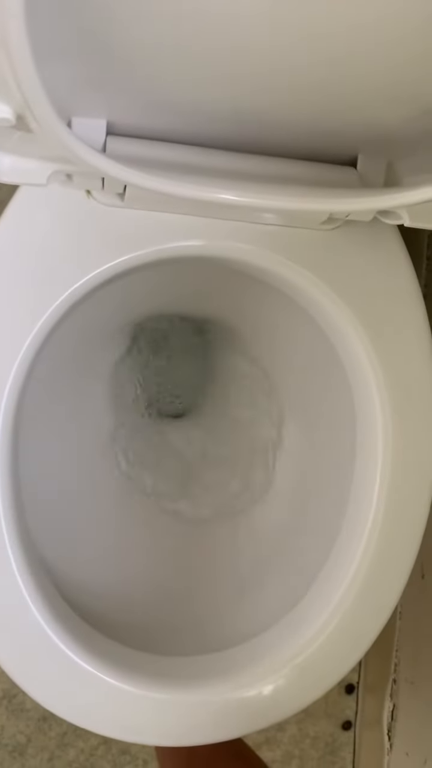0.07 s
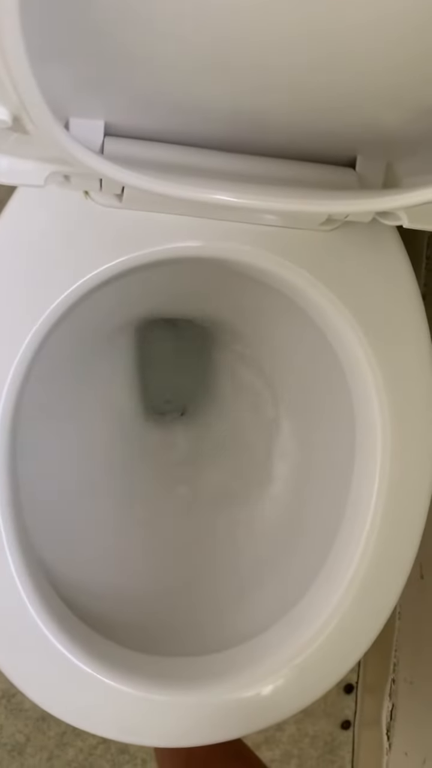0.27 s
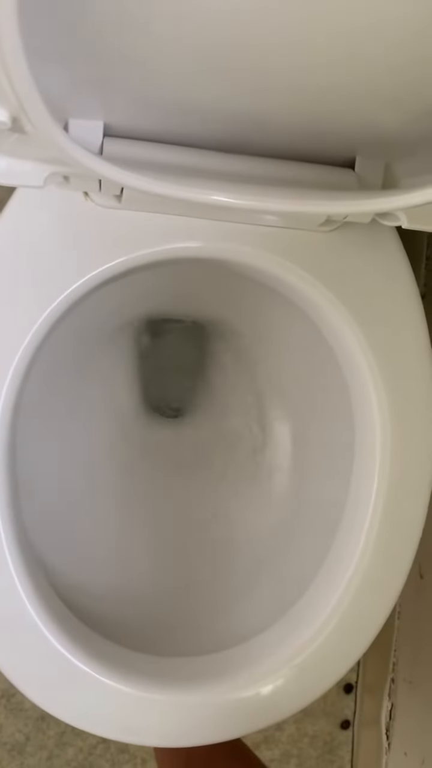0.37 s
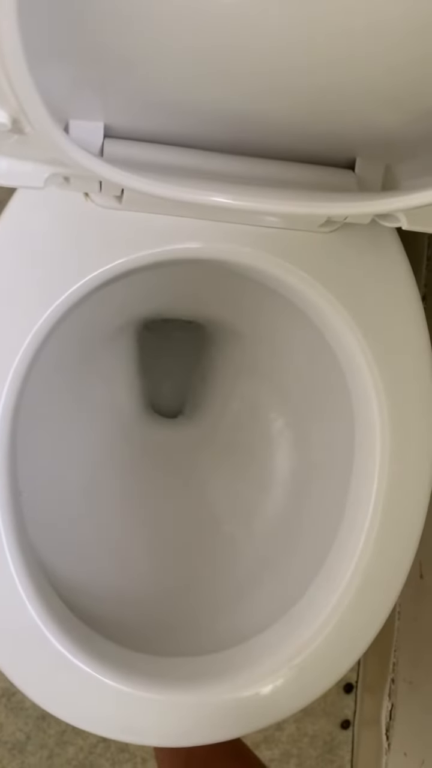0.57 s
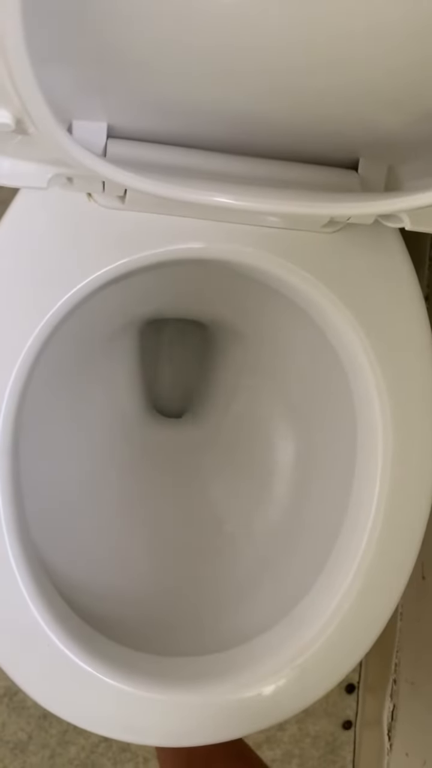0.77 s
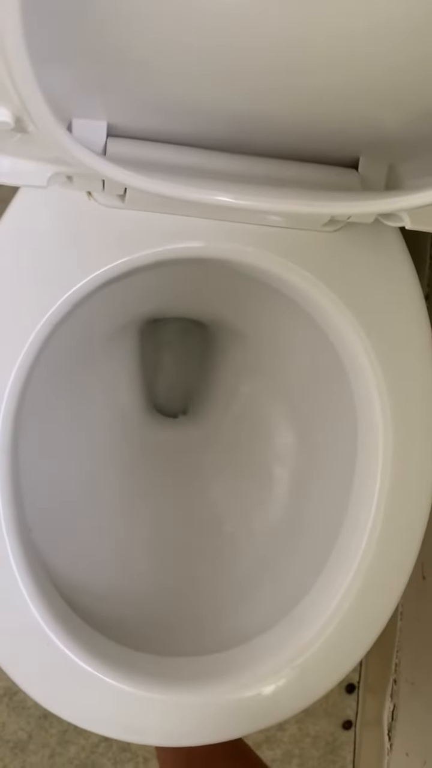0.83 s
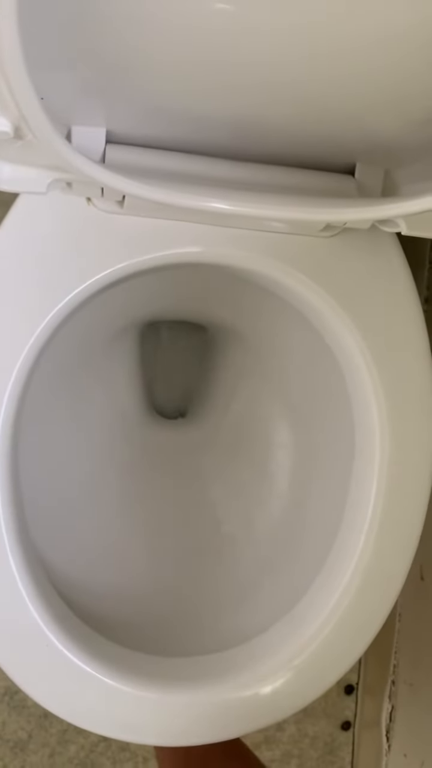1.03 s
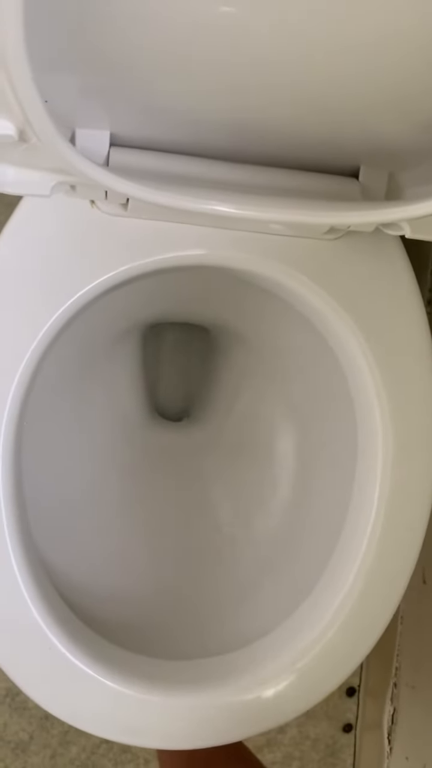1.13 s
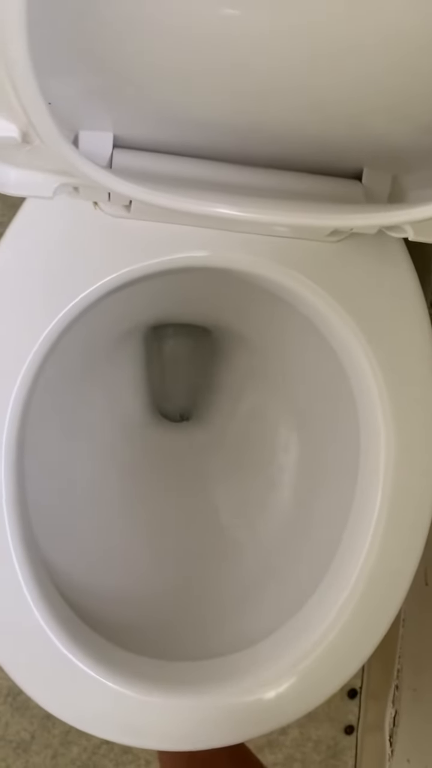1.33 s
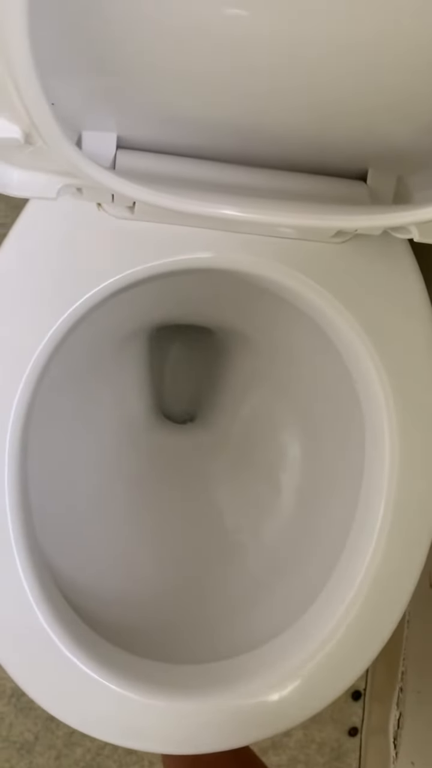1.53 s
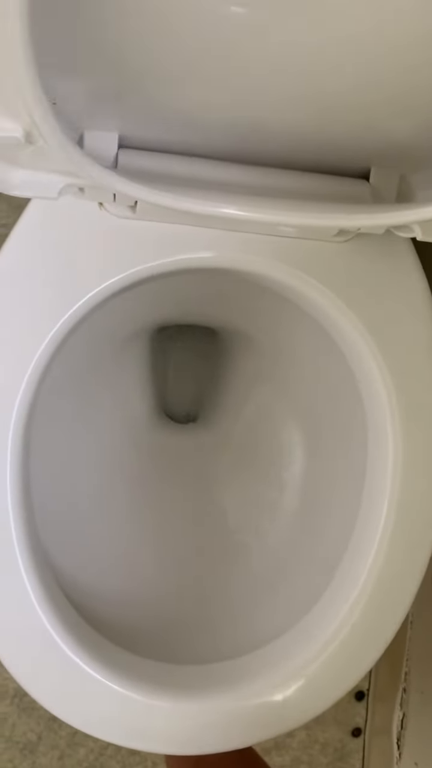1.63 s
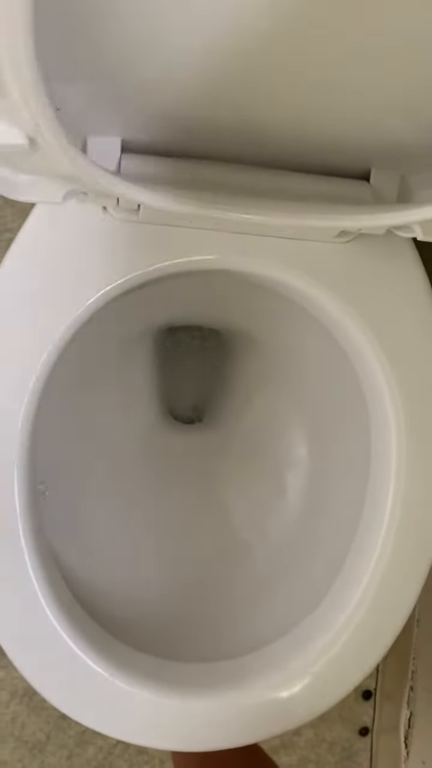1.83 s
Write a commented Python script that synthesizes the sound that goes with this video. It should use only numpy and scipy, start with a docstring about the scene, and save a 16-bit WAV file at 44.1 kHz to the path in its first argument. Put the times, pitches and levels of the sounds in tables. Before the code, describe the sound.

Wet, hollow gurgles from a toilet bowl as the last flush water drains away, then it settles

```python
"""Air gulping down a drain at the end of a toilet flush, heard from above the bowl in a small tiled room.
Each gulp booms as a pocket in the trap, rings a cluster of bubbles, sloshes the bowl and throws noisy spray.
Around it lone bubbles ring, the low ones as a thump, and drops tick; rinse water is bubble swarms and hiss.
Behind lies the drain pipe: a narrow noise drone over rumble.
Phase and level differences spread the water in stereo."""
import sys
import numpy as np
from scipy import signal
from scipy.fft import rfft, irfft
from scipy.io import wavfile

SR = 44100
rng = np.random.default_rng(int(sys.argv[2]) if len(sys.argv) > 2 else 0)


def inscribe(sig):
    """Save sig as 16-bit PCM at rate SR to the path in sys.argv[1].

    A 1-D sig is mono; a 2-D sig holds one channel per row.
    Samples are clipped to [-1, 1] before scaling.
    """
    pcm = np.round(np.clip(np.atleast_2d(sig).T, -1, 1) * 32767)
    wavfile.write(sys.argv[1], SR, pcm.astype(np.int16))


N = 83790  # samples, 1.9 s
T = np.arange(N) / SR
HZ = np.maximum(np.arange(N + 1) * SR / (2 * N), 1)  # frequency axis of the filters

# Drone of the drain pipe: [t/s, level/dB]
DRONE_LEVEL = [(0, -42.5), (.3, -31.5), (.5, -39.5), (.9, -37.5), (.98, -29.5), (1.15, -35), (1.45, -31),
               (1.65, -38), (1.9, -39)]
# Soft rumble under the drone, spectrum: [f/Hz, relative level/dB]
RUMBLE_SPECTRUM = [(25, -40), (50, 11), (110, -18), (180, 8.5), (300, -15), (600, -12), (2000, -51)]
# Running water: [t/s, low gurgle level/dB, churning in the bowl level/dB, relative hiss and fizz level/dB]
FLOW_LEVELS = [(0, -35, -72, -39), (.11, -36.5, -55, -37), (.16, -42, -48, -31), (.35, -32, -43.5, -36),
               (.52, -30, -28, -30), (.6, -23.5, -29, -28), (.69, -26, -32, -31.5), (.8, -33, -30, -31),
               (.9, -29.5, -34.5, -32.5), (1.05, -34, -27, -33.5), (1.24, -29.5, -29.5, -31),
               (1.33, -18.5, -30, -34), (1.5, -28, -29.5, -33.5), (1.6, -29, -27.5, -33),
               (1.72, -43.5, -41, -33.5), (1.9, -40, -35, -37)]
# Hiss of the rinse water, spectrum: [f/Hz, relative level/dB]
HISS_SPECTRUM = [(800, 14.5), (1600, 12), (2300, 2.5), (3500, 5), (5200, 0), (8500, 3.5), (11500, 1.5),
                 (15500, -2)]
# Lone bubbles that ring on: [t/s, starting f/Hz, level/dB, decay/s]
LONE_BUBBLES = [(.118, 554.4, -22, 0.084), (0.119, 120, -13, 0.017), (.139, 2065, -11, 0.005),
                (.141, 1879, -26, 0.056), (.141, 1604, -11, 0.0046), (0.146, 1130, -39, 0.028),
                (0.153, 81.3, -12, 0.053), (0.287, 1880, -22, .026), (0.313, 1482, -18, 0.011),
                (0.379, 403, -20, 0.03), (0.448, 1874, -22, 0.0074), (.482, 2940, -19, 0.0058),
                (0.482, 1009, -7.5, 0.011), (.643, 1856, -19, .007), (0.705, 2770, -20.5, 0.012),
                (0.842, 1105, -7, 0.005), (.845, 221.6, -23, 0.052), (1.03, 915, -11, 0.0086),
                (1.294, 1863, -14.5, 0.0077), (1.301, 1064, -8.5, 0.0059), (1.386, 1410, -20.5, 0.02),
                (1.5434, 1057, -4, 0.0037), (1.685, 929, -27.5, 0.02), (1.71, 269, -23.5, 0.017),
                (1.813, 1770, -16, 0.003), (1.83, 224, -26.5, 0.028)]
# Single splashing drops: [t/s, relative level/dB, splash f/Hz]
SPLASH_DROPS = [(.139, -13, 2120), (0.139, -18.5, 9000), (0.166, -26, 6050), (0.313, -21.5, 10600),
                (.374, -23.5, 10200), (0.481, -23, 6500), (0.562, -15.5, 2870), (0.93, -19, 6100),
                (1.199, -23, 6300), (1.385, -23, 7300), (1.412, -22, 11100), (1.589, -24, 7050),
                (1.723, -22.5, 4000)]
# Gulps of air: [t/s, starting bubble f/Hz, starting air pocket f/Hz,
#                relative pocket level/dB, relative bubbles level/dB, relative spray level/dB]
AIR_GULPS = [(.115, 952, 229, -26, -24, -51), (0.252, 1456, 233, -24.5, -22.5, -36.5),
             (0.374, 1057, 350.5, -17.5, -23.5, -60), (.425, 848, 426, -26.5, -19, -36),
             (.473, 990, 318, -19.5, -17, -30.5), (.547, 998, 243, -22.5, -21, -33),
             (0.564, 1015, 338, -19, -34, -48), (.581, 1040, 318, -16.5, -26.5, -34.5),
             (0.601, 983, 409, -25, -15.5, -48), (.625, 944, 323, -19, -23.5, -32),
             (.688, 1434, 282, -16.5, -17.5, -30), (.701, 972, 299.5, -14, -15.5, -21),
             (.744, 712, 315, -19, -23, -30), (.839, 622, 248, -16, -13, -22),
             (.956, 833, 387.6, -19, -14, -24.5), (1.106, 1060, 232, -14.5, -46, -38),
             (1.119, 965, 381, -23, -19.5, -26), (1.271, 940, 311, -13, -25, -39),
             (1.291, 675, 267, -25, -14, -27.5), (1.3, 878, 273, -11, -17.5, -38),
             (1.317, 656, 385, -16, -17.5, -33), (1.34, 928, 321, -18, -21.5, -41),
             (1.358, 657, 380, -25, -20.5, -47), (1.385, 963, 310.5, -11, -16.5, -47),
             (1.414, 812, 314, -16, -16, -31.5), (1.539, 924, 287, -22, -16, -30)]
# Spray and the ticks of drops, spectrum: [f/Hz, relative level/dB]
SPRAY_SPECTRUM = [(600, -58), (1500, -1), (3000, 5), (5000, -1), (8000, -1.5), (11500, -2.5), (15500, -16)]
# Resonances of bowl and trap: [f/Hz, width/Hz, relative level/dB]
BOWL_RESONANCES = [(229, 12.6, 3.5), (305, 22, -3.5), (381, 21.4, 8.5), (637, 207, -7.5), (880, 254, -6.5),
                   (1078, 204, -4), (1368, 48, 0.5), (1789, 54, -1)]
# Pitches that cancel inside the bowl: [f/Hz, width/Hz, depth/dB]
BOWL_HOLLOWS = [(181.5, 35, -30), (555, 113, -4), (1208, 110, -57.5), (1596, 78, -16.5), (2070, 2000, -5.5)]
# Phase lead of the left channel by frequency: [f/Hz, phase/rad]
LEFT_LEAD = [(0, 0), (300, -.1), (860, -.7), (1900, .6), (3300, 1.2), (4750, 3.14), (6700, 6.28),
             (15400, 18.85), (22050, 28.5)]
# Level balance of left and right by frequency: [f/Hz, left minus right level/dB]
LEFT_RIGHT_BALANCE = [(330, -0.5), (600, -2), (1000, -7), (1500, -2.5), (2400, -2), (4000, -0.5)]

# Drain pipe; the drone passes its resonance twice
DRONE_HZ, DRONE_WIDTH_HZ, RUMBLE_DB = 76.1, 16.2, -44
# Rinse water: swarms of small bubbles, then the mix of fizz and hiss
GURGLE_PER_S, GURGLE_CYCLES, GURGLE_SPREAD_DB = 170, 4.5, 3.5
CHURN_PER_S, CHURN_CYCLES, CHURN_SPREAD_DB = 320, 9, 4
FIZZ_PER_S, FIZZ_CYCLES, FIZZ_SPREAD_DB = 1500, 14, 4.5
CHURN_GLIDE, FIZZ_GLIDE = 0.025, 0.002  # share of the pitch climbed in one decay time
FIZZ_DB, HISS_DB = -6, -1
HISS_PATCHY_DB, SPRAY_PATCHY_DB, PATCHES_PER_S = 3.5, 6.5, 170
# Bubbles and drops
BUBBLE_ONSET_CYCLES, BLOOP_RISE_PER_S = 0.55, 0.026
TICK_DB, TICK_ATTACK_S, TICK_DECAY_S = -8, 0.0002, 0.0018
DROP_DB, DROP_ATTACK_S, DROP_DECAY_S, DROP_WIDTH = -7.5, 0.0013, 0.01, 0.61  # width as a share of f
# Gulps: trims on the table levels, and the shape of each part
POCKET_DB, POCKET_DECAY_S, POCKET_RISE_PER_S = 5, 0.013, 1.6
BUBBLE_DB, BUBBLE_CYCLES, BUBBLE_RISE_PER_S = 5.5, 5.83, 3.46
SATELLITE_DB, SATELLITE_SPAN_S, SATELLITE_OCTAVES, SATELLITE_CYCLES = -7.5, 0.02, 0.238, 5.6
SLOSH_DB, SLOSH_ATTACK_S, SLOSH_DECAY_S = -4, 0.00399, 0.012
SPRAY_DB, SPRAY_LAG_S, SPRAY_ATTACK_S, SPRAY_DECAY_S = 1.5, 0.0035, 0.0015, 0.0085
# Room and recorder
ROOM_T60_S, ROOM_GAP_S, ROOM_DB, ROOM_TREBLE_DB = 0.19, 0.0065, -11.5, -4
TOP_HZ = 15800


def undb(db):
    """Decibels to gain."""
    return 10 ** (np.asarray(db) / 20)


def unit(x):
    """Scale to rms 1."""
    return x / np.sqrt(np.mean(x ** 2))


def filt(x, response):
    """Filter by a response given on HZ."""
    return irfft(rfft(x, 2 * N) * response)[..., :N]


def colour(points):
    """Gain on HZ from (f/Hz, level/dB) points, joined along log frequency."""
    hz, db = np.array(points, float).T
    return undb(np.interp(np.log(HZ), np.log(hz), db))


def resonance(hz, width):
    """Response of one band-pass resonance."""
    return 1 / (1 + 1j * (HZ ** 2 - hz ** 2) / (HZ * width))


def curve(table, axis=1):
    """Gain over time from a dB column."""
    columns = np.array(table, float).T
    return undb(np.interp(T, columns[0], columns[axis]))


def add(out, s, sound):
    """Mix a sound in at time s."""
    start = int(np.clip(s * SR, 0, N - 1))
    out[start:start + len(sound)] += sound[:N - start]


def burst(noise, attack, decay):
    """Noise that swells and dies away, with the energy of its envelope at peak 1."""
    t = T[:len(noise)]
    env = (1 - np.exp(-t / attack)) * np.exp(-t / decay)
    energy = np.sqrt(np.mean(env ** 2)) / env.max()
    return unit(noise * env) * energy


def bubble(hz, decay, rise):
    """A damped ring that swells within a cycle or two; its pitch climbs as the bubble nears the surface."""
    t = T[:int(6 * decay * SR) + 2]
    ring = np.sin(2 * np.pi * hz * t * (1 + rise * t / 2))
    onset = 1 - np.exp(-(t * hz / BUBBLE_ONSET_CYCLES) ** 2)
    return ring * np.exp(-t / decay) * onset


def swarm(per_s, low_hz, high_hz, cycles, spread_db, glide):
    """Random small bubbles, a few louder than the rest; each climbs by the share glide as it fades."""
    out = np.zeros(N)
    draws = rng.random((6000, 3))
    pitch_ratio = min(high_hz, TOP_HZ) / low_hz
    for when, pitch, size in draws[:int(per_s * N / SR)]:
        hz = low_hz * pitch_ratio ** pitch
        level = undb(-spread_db * np.log(size + 0.02)) * np.sqrt(hz)
        add(out, when * N / SR, level * bubble(hz, cycles / hz, glide * hz / cycles))
    return unit(out)


def patchy(spectrum, depth_db, count=20):
    """Noise of many droplets: every narrow band flares and fades on its own."""
    noise = rfft(rng.standard_normal(N), 2 * N) * colour(spectrum)
    out = 0
    step = TOP_HZ / (count - 1)
    for k in range(count):
        flare = np.interp(T * PATCHES_PER_S, np.arange(N // 50), rng.standard_normal(N // 50))
        band = np.maximum(1 - abs(HZ / step - k), 0)  # triangles that overlap their neighbours
        out = out + irfft(noise * band)[:N] * undb(depth_db * flare)
    return unit(out)


def bowl():
    """Response of the bowl and its trap: resonances in a broad band, closed off at both ends."""
    modes = sum(undb(db) * resonance(hz, width) for hz, width, db in BOWL_RESONANCES)
    return modes * resonance(440, 990) / (1 + (170 / HZ) ** 6) / (1 + (HZ / 2300) ** 6)


def hollows():
    """Response of the dips where reflections in the bowl cancel."""
    dips = [1 - (1 - undb(db)) * resonance(hz, width) for hz, width, db in BOWL_HOLLOWS]
    return np.prod(dips, axis=0)


def room(x):
    """Tiled walls: a short dense tail, alike on both sides in the bass."""
    env = undb(-60 * T / ROOM_T60_S) * (T > ROOM_GAP_S)
    tails = rng.standard_normal((2, N)) * env / np.sqrt(np.sum(env ** 2))
    mid, side = rfft(tails, 2 * N)
    apart = np.clip(HZ / 330, 0, 1) ** 2
    walls = (mid + apart * side * np.array([[1], [-1]])) / np.sqrt(1 + apart ** 2)
    tiles = colour([(90, -2), (250, 3.5), (2200, 9.0), (6000, ROOM_TREBLE_DB)])
    return filt(x, walls * tiles) * undb(ROOM_DB)


def drain():
    """The air in the drain pipe drones over a soft rumble."""
    drone = signal.hilbert(filt(rng.standard_normal(N), resonance(DRONE_HZ, DRONE_WIDTH_HZ) ** 2))
    drone = unit(drone.real / np.sqrt(abs(drone)))  # evens out the swells of narrow noise
    rumble = unit(filt(rng.standard_normal(N), colour(RUMBLE_SPECTRUM)))
    return drone * curve(DRONE_LEVEL) + undb(RUMBLE_DB) * rumble


def rinse():
    """Water gurgles in the trap, churns in the bottom of the bowl, and fizzes and hisses down its sides."""
    gurgle = swarm(GURGLE_PER_S, 191.2, 390.5, GURGLE_CYCLES, GURGLE_SPREAD_DB, CHURN_GLIDE)
    gurgle = unit(filt(gurgle, np.sqrt(bowl())))
    churn = swarm(CHURN_PER_S, 636.8, 2428, CHURN_CYCLES, CHURN_SPREAD_DB, CHURN_GLIDE)
    churn = unit(filt(churn, bowl()))
    fizz = swarm(FIZZ_PER_S, 1678, 11740, FIZZ_CYCLES, FIZZ_SPREAD_DB, FIZZ_GLIDE)
    fizz = unit(filt(fizz, colour(HISS_SPECTRUM)))
    hiss = patchy(HISS_SPECTRUM, HISS_PATCHY_DB)
    low = gurgle * curve(FLOW_LEVELS) + churn * curve(FLOW_LEVELS, axis=2)
    high = undb(FIZZ_DB) * fizz + undb(HISS_DB) * hiss
    return low + high * curve(FLOW_LEVELS, axis=3)


def drops():
    """Drops hit the porcelain: a bright tick, then a short splash around one pitch."""
    out, size = np.zeros(N), SR // 20
    for s, db, hz in SPLASH_DROPS:
        noise = rng.standard_normal(N)
        tick = filt(noise, colour(SPRAY_SPECTRUM))[size:2 * size]
        splash = filt(noise, resonance(hz, DROP_WIDTH * hz) ** 2)[:size]
        add(out, s, undb(db + TICK_DB) * burst(tick, TICK_ATTACK_S, TICK_DECAY_S))
        add(out, s, undb(db + DROP_DB) * burst(splash, DROP_ATTACK_S, DROP_DECAY_S))
    return out


def bloops():
    """Single bubbles each ring at one pitch and die away; the low ones thump."""
    out = np.zeros(N)
    for s, hz, db, decay in LONE_BUBBLES:
        add(out, s, undb(db) * bubble(hz, decay, BLOOP_RISE_PER_S))
    return out


def satellites(hz, count=6):
    """A quick chain of bubbles around the main bubble's pitch, each weaker than the last."""
    out = np.zeros(SR // 8)
    for k, (when, pitch) in enumerate(rng.random((count, 2))):
        own_hz = hz * 2 ** (SATELLITE_OCTAVES * (3 * pitch - 1))
        ring = bubble(own_hz, SATELLITE_CYCLES / own_hz, BUBBLE_RISE_PER_S)
        add(out, SATELLITE_SPAN_S * (k + when) / count, undb(-1.5 * k) * ring)
    return out


def gulps():
    """Air breaks into the trap: the pocket booms, bubbles ring, water sloshes in the bowl and spray flies."""
    out, size = np.zeros(N), 4000
    slosh = unit(filt(rng.standard_normal(N), bowl() / (1 + (420 / HZ) ** 2)))
    spray = patchy(SPRAY_SPECTRUM, SPRAY_PATCHY_DB)
    for s, bubble_hz, pocket_hz, pocket_db, bubbles_db, spray_db in AIR_GULPS:
        pick = rng.integers(0, N - size)
        boom = bubble(pocket_hz, POCKET_DECAY_S, POCKET_RISE_PER_S)
        ring = bubble(bubble_hz, BUBBLE_CYCLES / bubble_hz, BUBBLE_RISE_PER_S)
        surge = burst(slosh[pick:pick + size], SLOSH_ATTACK_S, SLOSH_DECAY_S)
        spatter = burst(spray[pick:pick + size], SPRAY_ATTACK_S, SPRAY_DECAY_S)
        add(out, s, undb(pocket_db + POCKET_DB) * boom)
        # the main bubble rings one slosh attack later; its chain starts just before it
        add(out, s + SLOSH_ATTACK_S, undb(bubbles_db + BUBBLE_DB) * ring)
        add(out, s, undb(bubbles_db + SATELLITE_DB) * satellites(bubble_hz))
        add(out, s, undb(bubbles_db + SLOSH_DB) * surge)
        add(out, s + SPRAY_LAG_S, undb(spray_db + SPRAY_DB) * spatter)
    return out


def scene():
    """The water is heard directly, spread by phase and level, and by way of the walls; the drain is centred."""
    water = filt(gulps() + drops() + bloops() + rinse(), hollows())
    sides = np.array([[.5], [-.5]])  # left and right share each difference equally
    phase = np.interp(HZ, *np.array(LEFT_LEAD).T)
    direct = filt(water, colour(LEFT_RIGHT_BALANCE) ** sides * np.exp(1j * phase * sides))
    return direct + room(water) + drain()


def record(dry):
    """The recorder cuts the top with a steep low-pass."""
    return signal.sosfilt(signal.ellip(10, .2, 80, TOP_HZ, fs=SR, output="sos"), dry)


dry = scene()
out = record(dry)
inscribe(out)
```